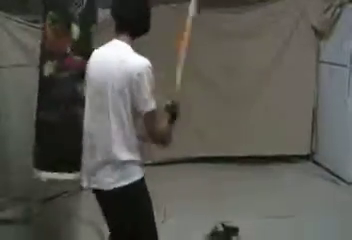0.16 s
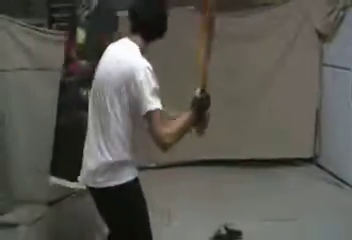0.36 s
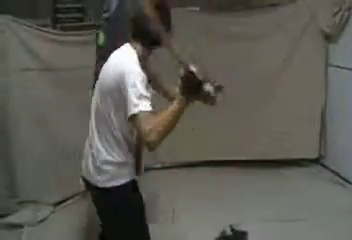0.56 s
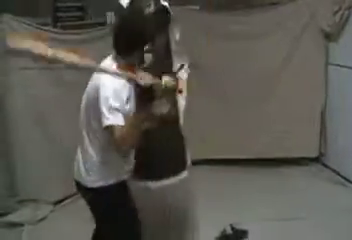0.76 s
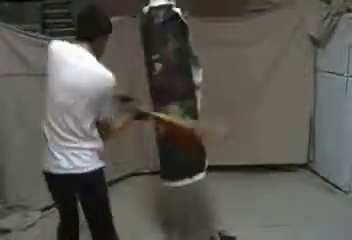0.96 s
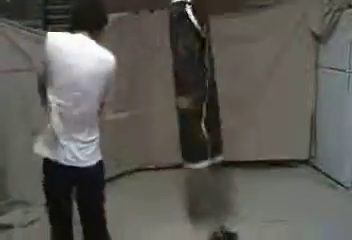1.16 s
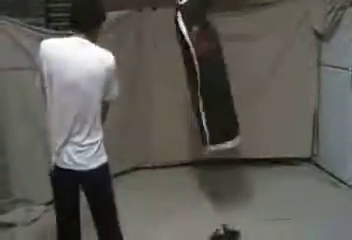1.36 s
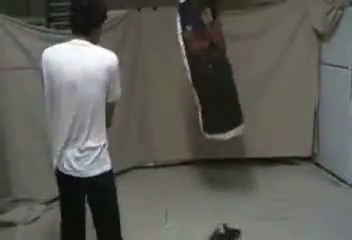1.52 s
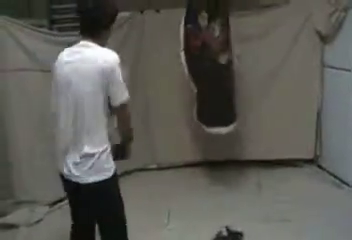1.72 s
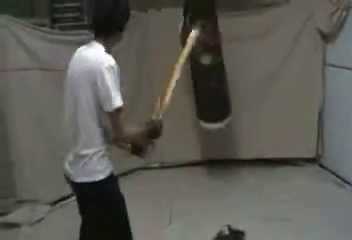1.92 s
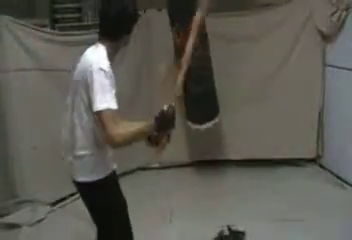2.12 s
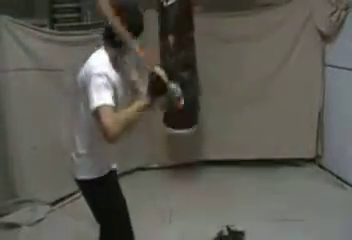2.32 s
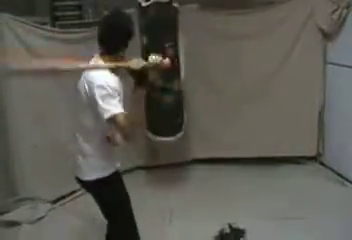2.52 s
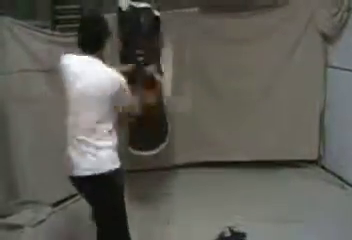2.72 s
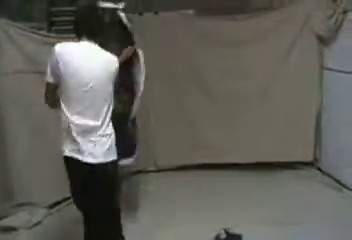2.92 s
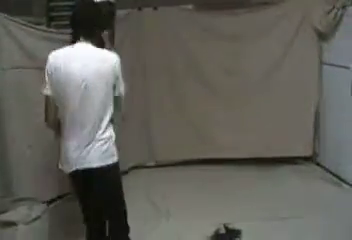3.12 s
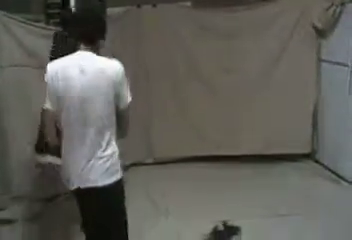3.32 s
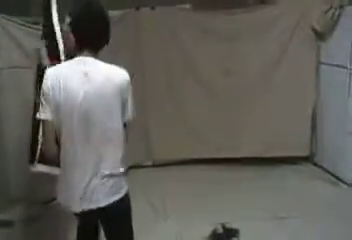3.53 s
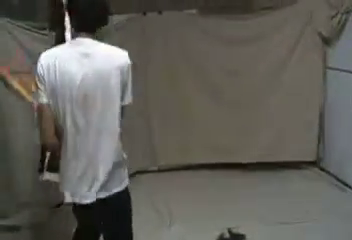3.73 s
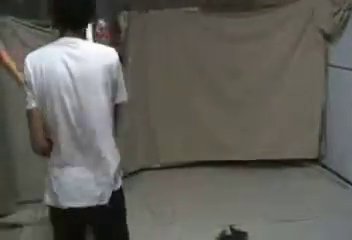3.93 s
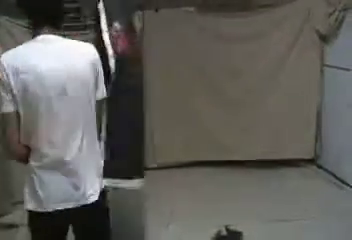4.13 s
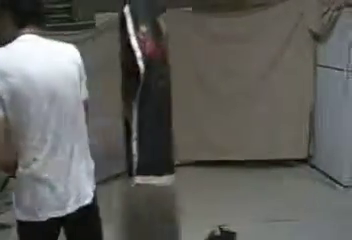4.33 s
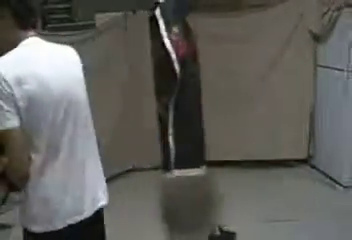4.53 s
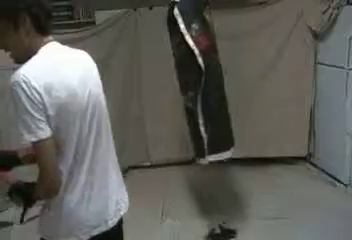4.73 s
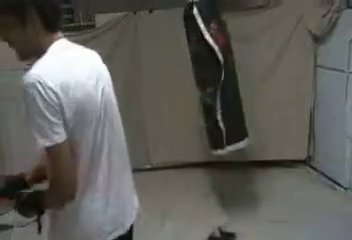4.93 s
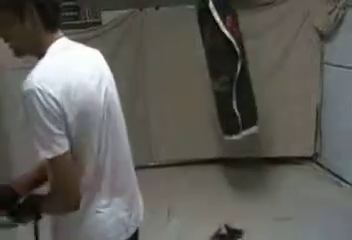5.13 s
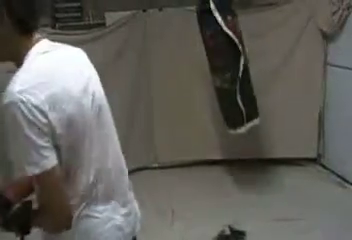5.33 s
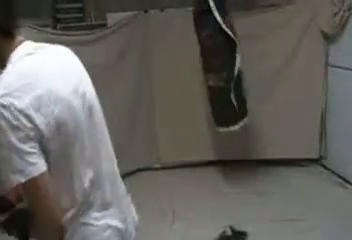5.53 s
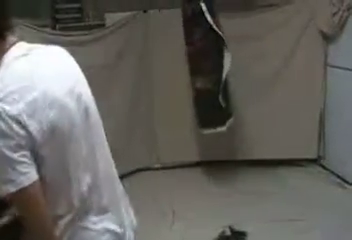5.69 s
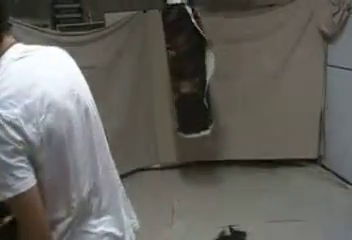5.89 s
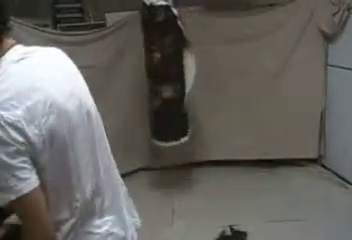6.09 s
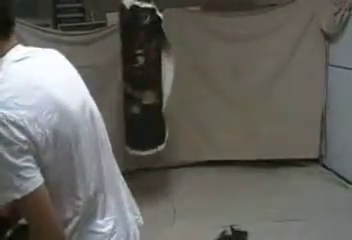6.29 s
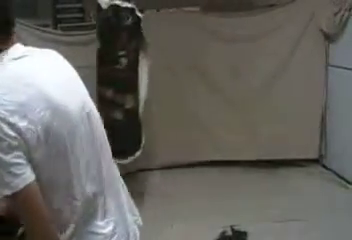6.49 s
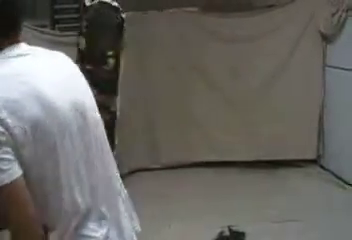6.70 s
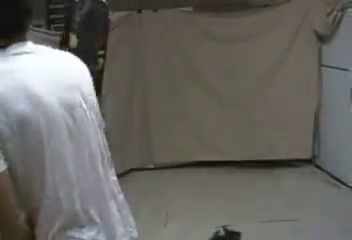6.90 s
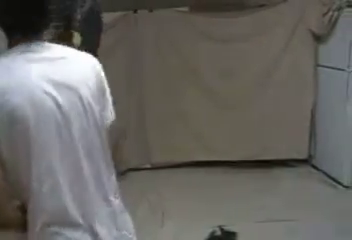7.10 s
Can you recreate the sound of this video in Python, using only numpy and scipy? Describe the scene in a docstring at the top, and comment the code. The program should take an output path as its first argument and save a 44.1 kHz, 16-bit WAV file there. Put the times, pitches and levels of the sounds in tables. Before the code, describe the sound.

In a humming garage, a wooden bat cracks twice into a heavy bag, walls rattling, before being set down hard on hollow wood.

```python
"""In a garage a wooden bat slaps a hanging heavy bag twice, then is put down hard on a hollow wooden surface.
The blows are noise slaps over a sine thump; the put-down bat excites drifting wood pitches. Resonant noise makes
the walls boom and wash. Shoes scuff in shaped noise and small things knock as short tones and filtered noise;
a soft rough tone comes and goes, and motor lines hum under rumble and hiss. Loud peaks overload a small microphone."""
import sys
import numpy as np
from scipy import signal
from scipy.fft import rfft, irfft, next_fast_len
from scipy.io import wavfile
from scipy.ndimage import uniform_filter1d

SR = 44100
rng = np.random.default_rng(int(sys.argv[2]) if len(sys.argv) > 2 else 0)


def dump(signal):
    """Clip the signal to [-1, 1] and save it as 16-bit WAV at the path in sys.argv[1]."""
    limited = np.clip(np.atleast_2d(signal).T, -1, 1)
    pcm = np.round(limited * 32767).astype(np.int16)
    wavfile.write(sys.argv[1], SR, pcm)


N = 315312
T = np.arange(N) / SR
AGE = np.arange(SR // 2) / SR  # time axis of a short sound, in seconds

# Bat on bag. Each row: start in seconds, crack level in dB, thump level in dB, thump pitch in Hz,
# contact time in seconds.
BAG_BLOWS = [(1.1753, 9.5, 0.5, 121, 0.0053), (2.9937, 7, 7.5, 110, .007)]
# Colour of the slap. Each row: frequency in Hz, relative density in dB per Hz.
CRACK_COLOUR = [(180, 1), (300, -2.5), (762, -10), (2250, -5), (3590, -10.5), (4630, -21), (8980, -20.5),
                (10900, -15.5), (14200, -57), (22000, -120)]
CRACK_T60_S, THUMP_T60_S = 0.015, 0.059

# Bat put down: first touch, then the full weight, then the moment the wood pitches line up.
TOUCH_S, WEIGHT_S, DEEPEST_S = 5.4215, 5.4248, 5.428
TOUCH_DB, WEIGHT_DB = -8, 4
# Pitches of the hollow wood. Each row: frequency in Hz, relative level in dB.
WOOD_PITCHES = [(151, 0), (215, -8.5), (285, -2.5), (345, -12.5), (436, -17), (590, -23.5)]

# Door and wall panels. Each row: resonance in Hz, width in Hz, relative level in dB.
PANEL_RESONANCES = [(28, 14, -5.5), (58.5, 19, 4)]
# Colour of the air's thud. Each row: frequency in Hz, relative density in dB per Hz.
THUD_COLOUR = [(76, -33), (130, -5.5), (167, 1), (427, -14), (450, -15), (580, -36), (990, -120)]
# Colour of the echoes and rattling. Each row: frequency in Hz, relative density in dB per Hz.
WASH_COLOUR = [(590, -28), (1000, -8), (1590, -1.5), (2020, -3.5), (2320, -1.5), (2670, -4.5), (3550, -5),
               (3860, -7.5), (4350, -7.5), (6000, -17), (7800, -55.5), (13200, -120)]
# Level of that wash, one curve for each blow and one for the drop. Each row: time in seconds, level in dB.
WASH_CURVES = [
    [(1.188, -19), (1.204, -20), (1.234, -16.5), (1.366, -21.5), (1.414, -26.5), (1.458, -25.5),
     (1.6, -35.5), (1.87, -56)],
    [(3.007, -22), (3.02, -22), (3.109, -16.5), (3.153, -25), (3.337, -29), (3.53, -42)],
    [(5.437, -28), (5.445, -29), (5.501, -30), (5.67, -45)],
]
# What else the garage gives back, same order. Each row: treble in dB over the wash, low part in dB over the wash,
# boom in dB, boom hold in seconds, standing wave in dB, thud in dB, thud hold in seconds, thud fall in dB per second.
GARAGE_ANSWERS = [(-15.5, -11, -21, .32, -16, -17.5, .09, 110),
                  (-12.5, -5, -19.5, .36, -15, -16.5, .11, 300), (-22, -4, -29, .03, -23, -12.5, .085, 230)]
TREBLE_FALL_DB_S, BODY_FALL_DB_S, BOOM_FALL_DB_S, STANDING_FALL_DB_S = 12, 16, 50, 60
LINGER_DB, LINGER_FALL_DB_S = -12, 50  # a weaker part of the thud stays on
# Slow cycles of pressure as the panels flap back. Each row: centre in seconds, peak in dB.
PANEL_SURGES = [(1.31, -13), (1.383, -5), (1.505, -8), (1.575, -18), (1.783, -18), (3.205, -6), (3.287, -5),
                (3.335, -11)]
SURGE_HZ, SURGE_S = 66, .013

# Thin bright ticks. Each row: start in seconds, level in dB, centre in Hz.
BRIGHT_TICKS = [(0.1294, -32, 3320), (0.2029, -13.5, 2560), (0.219, -27, 3000), (0.284, -33, 8500),
                (1.052, -34, 4000), (1.1265, -27, 1500), (1.238, -7, 1500), (4.2794, -41, 3260),
                (4.7686, -32, 2880), (4.8464, -30, 4100), (4.8783, -32, 2830), (5.2994, -38, 2700),
                (5.3911, -36, 3250)]
# Small knocks of feet, bat and gear. Each row: start in seconds, level in dB, centre in Hz, tail t60 in seconds,
# tail in dB over the level, bright click in dB over the level.
SMALL_KNOCKS = [(0.073, -19, 403, 0.47, -3, -14), (0.205, -14, 626, 0.38, -8.5, 1),
                (0.875, -28, 380, 0.25, -5, -3.5), (1.126, -29, 501, 0.25, -1, 6),
                (4.056, -13.5, 434, 0.43, -5, 0), (4.732, -21, 610, 0.17, -6, -18.5),
                (4.764, -25.5, 464, 0.2, -1, -9.5), (4.877, -24, 374, 0.23, -2.5, -8.5),
                (5.256, -14.5, 537, 0.6, -6, -12.5), (5.929, -22.5, 568, 0.25, -8, -6.5),
                (6.075, -18, 910, 0.25, -9, .6), (6.142, -18.5, 820, 0.25, -13, -19.5),
                (6.464, -31, 1080, 0.19, -3, -3.5)]
KNOCK_DELAY_S = .0015  # each knock sounds this many seconds after its listed start

# Shoes, cloth and the swung bat rubbing and swishing. Each row: loudest moment in seconds, level in dB,
# seconds to rise 20 dB, seconds to fall 20 dB, treble in dB over the level.
RUBS = [(0.01, -40, .05, .3, -12), (0.124, -38, .15, .2, -6), (0.206, -33, .02, .05, -12),
        (0.3, -48, .3, .5, -5), (1.1, -50, .08, .12, 5), (1.168, -39, .15, .02, -3),
        (1.962, -39, .08, .15, -4.5), (2.9, -50, .12, .1, 6), (2.98, -43, .05, .02, -20),
        (3.56, -38.5, .2, .1, -17), (3.61, -28.5, .06, .06, -5), (3.66, -40, .05, .2, -10),
        (4.1, -48.5, .03, .15, -9), (4.258, -47.5, .1, .25, -8), (4.49, -55, .12, .04, -5),
        (4.76, -57, .03, .2, 5), (5.304, -53, .12, .2, 4), (5.775, -36.5, .2, .2, -5),
        (5.86, -43, .1, .16, -12), (6.378, -44, .07, .1, -12)]
THIN_DB = -9  # rubs brighter than this lose their low end, duller ones gain it

# A soft rough tone, perhaps the hanging of the bag. Each row: start in seconds, length in seconds, pitch in Hz,
# level in dB.
CREAK_TONES = [(1.59, .13, 385, -48), (1.75, .2, 385, -54), (2.1, .45, 390, -58), (3.47, .055, 385, -38),
               (3.55, .1, 380, -47), (4.99, .25, 393, -43.5), (6.88, .16, 385, -47.5), (7.07, .1, 390, -49)]
CREAK_EDGE_S, CREAK_WANDER_HZ = .04, 12

# Motor lines. Each row: frequency in Hz, level in dB.
MOTOR_LINES = [(56.5, -42.5), (113.0, -35.5), (226.1, -58), (603, -65.5), (969.0, -71.5), (1254, -64.5),
               (1599, -65)]
# Low air movement. Each row: time in seconds, level in dB.
RUMBLE_LEVEL = [(0.0, -19), (0.086, -20), (0.508, -34), (1.088, -27), (1.8, -30), (2.016, -31),
                (2.752, -33), (2.858, -39), (2.96, -27), (3.7, -26), (4.054, -32), (5.38, -32),
                (5.848, -39), (6.05, -32.5), (6.87, -37), (7.15, -31.5)]
# Colour of the hiss. Each row: frequency in Hz, relative density in dB per Hz.
HISS_COLOUR = [(76, -31.5), (130, -4.5), (140, -18), (227, -18.5), (253, -21), (388, -22.5), (542, -27),
               (617, -26.5), (729, -31.5), (1560, -31.5), (10900, -45), (14200, -81.5), (22000, -120)]
# Swelling and sinking of the middle of the hiss. Each row: time in seconds, gain in dB.
HISS_SWELL = [(0.0, 0), (0.53, -2), (0.62, 2), (0.8, 3), (1.0, -.5), (2.1, 0), (2.27, 2), (2.7, -3),
              (3.9, -.5), (4.62, -4.5), (5.08, 3), (6.0, 0), (6.7, -6), (6.85, -4.5), (6.95, -1),
              (7.15, -1.5)]
HISS_DB, HISS_MIDDLE_HZ, HISS_WIDTH_HZ = -42.5, 1700, 2200

# How alike left and right are in all stereo noise. Each row: frequency in Hz, correlation from 0 to 1.
STEREO_LIKENESS = [(30, .99), (60, .997), (250, .992), (500, .96), (1000, .87), (2000, .72), (4000, .2),
                   (8000, .55)]
LEFT_DB = .8  # left over right
TOP_HZ = 11000


def blows():
    """A slap of the cover while the bat sinks in, and one heavy swing of pressure from the squeezed filling."""
    out, slap = np.zeros((2, N)), noise(CRACK_COLOUR)
    for s, crack_db, thump_db, hz, contact in BAG_BLOWS:
        slap_in = fall(0.15) * (AGE < contact) * cut(slap, s)
        slap_after = fall(CRACK_T60_S) * cut(slap, s + contact)
        thump = fall(THUMP_T60_S) * np.sin(2 * np.pi * hz * AGE)
        add(out, s, undb(crack_db) * slap_in)
        add(out, s + contact, undb(crack_db - 16.5) * slap_after)
        add(out, s, -undb(thump_db) * thump)
    return out


def drop(woody):
    """A tick of first contact, then a short hard push into the hollow wood."""
    out, grit = np.zeros((2, N)), band(930, 11000, skirt_db=-20)
    touch = fall(0.011, rise=.0004) * cut(grit, TOUCH_S)
    bright = fall(0.046) * ring(cut(grit, WEIGHT_S), 2000, 1900)
    push = fall(0.075, rise=.0004) * cut(woody, WEIGHT_S)
    clack = undb(-4) * fall(0.05, rise=.0006) * np.sin(2 * np.pi * 560 * AGE)
    add(out, TOUCH_S, undb(TOUCH_DB) * touch)
    add(out, WEIGHT_S, undb(-10) * bright)
    add(out, WEIGHT_S, undb(WEIGHT_DB) * (push - clack))
    return out


def wood():
    """The pitches of the hollow wood, in step at the blow and drifting apart after it; rms 1."""
    drift = np.clip((T - DEEPEST_S) / .03, 0, 1)
    pitches = 0
    for hz, db in WOOD_PITCHES:
        level = undb(db + 3.7 * drift * walk(60))
        phase = 2 * np.pi * hz * (T - DEEPEST_S) + 2.1 * drift * walk(60)
        pitches = pitches + level * np.cos(phase)
    return unit(pitches)


def surges():
    """A few cycles of slow pressure swell and fade each time the panels flap back."""
    out = 0
    for s, db in PANEL_SURGES:
        swell = np.exp(-.5 * ((T - s) / SURGE_S) ** 2)
        out = out + undb(db) * swell * np.cos(2 * np.pi * SURGE_HZ * (T - s))
    return out


def garage(woody):
    """Panels boom long, the air thuds, and a grainy wash of echoes and rattling loses its treble."""
    push = band(20, 80)
    boom = unit(sum(undb(db) * ring(push, hz, width) for hz, width, db in PANEL_RESONANCES))
    standing = band(75, 112.3, skirt_db=-28)  # lowest standing waves of the room
    grain = undb(1.4 * walk(150))
    wash, treble, body = noise(WASH_COLOUR), band(6800, 9470), band(440, 880, skirt_db=-14)
    # after the drop the walls return the pitches of the wood
    thud = np.where(T < TOUCH_S, noise(THUD_COLOUR), woody)
    out = surges()
    for curve, row in zip(WASH_CURVES, GARAGE_ANSWERS):
        treble_db, body_db, boom_db, boom_hold, standing_db, thud_db, thud_hold, thud_fall = row
        s, db = np.transpose(curve)
        age = T - s[0]
        onset = np.clip(1 + age / .004, 0, 1)
        fade_out = np.clip(1 - (T - s[-1]) / .04, 0, 1)
        wash_level = undb(np.interp(T, s, db)) * fade_out

        lows = held(age, boom_db, boom_hold, BOOM_FALL_DB_S) * boom
        lows = lows + held(age, standing_db, 0, STANDING_FALL_DB_S) * standing
        thud_level = held(age, thud_db, thud_hold, thud_fall)
        linger_level = held(age, thud_db + LINGER_DB, 0, LINGER_FALL_DB_S)
        highs = wash + held(age, treble_db, 0, TREBLE_FALL_DB_S) * treble
        highs = highs + held(age, body_db, 0, BODY_FALL_DB_S) * body
        out = out + onset * (lows + (thud_level + linger_level) * thud + grain * wash_level * highs)
    return out


def ticks(grain):
    """Thin bright ticks: short noise through two equal resonances."""
    out = np.zeros((2, N))
    for s, db, hz in BRIGHT_TICKS:
        burst = fall(.04) * cut(grain, s)
        add(out, s, undb(db) * ring(ring(burst, hz, .6 * hz), hz, .6 * hz))
    return out


def knocks():
    """Ticks, and dead knocks of a few cycles, each with a brighter click and a short roomy tail."""
    grain = band(250, 9000, skirt_db=-12)
    out = ticks(grain)
    for s, db, hz, t60, tail_db, click_db in SMALL_KNOCKS:
        phase = 2 * np.pi * hz * AGE
        modes = np.sin(phase) + .6 * np.sin(.63 * phase) + .5 * np.sin(1.47 * phase)
        body = fall(.012, rise=.0015) * modes
        tail = ring(ring(fall(t60, rise=.004) * cut(grain, s), hz, 1.2 * hz), hz, 1.6 * hz)
        click_tones = np.sin(2 * np.pi * 2300 * AGE) + .7 * np.sin(2 * np.pi * 1350 * AGE)
        # the bright tail reads the grain 0.1 s further on
        bright_tail = ring(ring(fall(1.03 * t60) * cut(grain, s + .1), 2000, 2100), 2000, 2400)
        click = fall(0.005, rise=0.0005) * click_tones + 0.12 * bright_tail
        knock = 2.12 * body + undb(tail_db) * tail + undb(click_db) * click
        add(out, s + KNOCK_DELAY_S, undb(db) * knock)
    return out


def scuffs():
    """Dense gritty friction; each rub swells to its loudest and dies away."""
    power, bright, dull = 0, 0, 0
    for s, db, rise, drop_s, treble_db in RUBS:
        away = np.where(T < s, (s - T) / rise, (T - s) / drop_s)
        rub = undb(db - 20 * away) ** 2 * (away < 1)
        power = power + rub
        bright = bright + rub * undb(treble_db) ** 2
        dull = dull + rub * undb(THIN_DB - treble_db) ** 2
    low = noise([(200, -37.5), (500, -0.5), (1500, -0.5), (4500, -4.5), (6500, -25.5), (9000, -91.5)])
    bottom = ring(low, 600, 700)
    treble = band(3700, 7900, skirt_db=-8.5)
    grit = np.sqrt(power) * (low - bottom) + np.sqrt(dull) * bottom + np.sqrt(bright) * treble
    return undb(1.3 * walk(200)) * grit


def creak():
    """A rough, throbbing tone with a faint smeared overtone."""
    starts, lengths, pitches, _ = np.transpose(CREAK_TONES)
    hz = np.interp(T, starts + lengths / 2, pitches) + CREAK_WANDER_HZ * walk(12)
    level = 0
    for s, length, _, db in CREAK_TONES:
        inside = np.minimum(T - s, s + length - T)
        level = level + undb(db) * np.clip(inside / CREAK_EDGE_S + .5, 0, 1)
    phase = 2 * np.pi * np.cumsum(hz) / SR + 2.5 * walk(50)
    tone = np.sin(phase) + undb(-13) * np.sin(3.3 * phase)
    return level * undb(4.2 * walk(120)) * np.sqrt(2) * tone


def motor():
    """Steady pitches of a motor whose level and phase waver."""
    hum = 0
    for hz, db in MOTOR_LINES:
        level = undb(db + 1.5 * walk(15)) * np.sqrt(2)
        hum = hum + level * np.sin(2 * np.pi * hz * T + .35 * walk(10))
    return hum


def low_air():
    """Rumble of low air movement: deep noise that rises and sinks."""
    colour = noise([(6, -29), (14, 5), (35, -10.5), (57, -8.5), (75, -9.5), (100, -32), (140, -22.5), (300, -75.5)])
    return undb(np.interp(T, *np.transpose(RUMBLE_LEVEL)) + 1.4 * walk(5.13)) * colour


def microphone_hiss():
    """Nearly steady microphone noise whose middle swells and sinks."""
    hiss = undb(HISS_DB + .7 * walk(4)) * noise(HISS_COLOUR)
    middle = ring(hiss, HISS_MIDDLE_HZ, HISS_WIDTH_HZ)
    swell = undb(np.interp(T, *np.transpose(HISS_SWELL)))
    return hiss - middle + swell * middle


def undb(db):
    """Amplitude from decibels."""
    return 10 ** (np.asarray(db) / 20)


def unit(x):
    """Scale to rms 1."""
    return x / np.sqrt(np.mean(x ** 2))


def along(points, hz):
    """Read (Hz, value) points on a log-frequency axis."""
    f, v = np.transpose(points)
    return np.interp(np.log(hz + 1), np.log(f), v)


def noise(points):
    """Stereo noise of a given colour, alike left and right in the bass; rms 1."""
    size = next_fast_len(N)
    hz = np.arange(size // 2 + 1) * SR / size
    alike = np.clip(along(STEREO_LIKENESS, hz), 0, 1)
    mid, side = rfft(rng.standard_normal((2, size))) * undb(along(points, hz))
    spectra = np.array([mid * np.sqrt(1 + alike), side * np.sqrt(1 - alike)])
    mid, side = irfft(spectra, size)[:, :N]
    return unit(np.array([mid + side, mid - side]))


def band(lo_hz, hi_hz, skirt_db=-30):
    """Flat band of noise, down to skirt_db half an octave outside and falling further beyond."""
    lower = [(lo_hz / 4, -90), (lo_hz / np.sqrt(2), skirt_db), (lo_hz, 0)]
    upper = [(hi_hz, 0), (hi_hz * np.sqrt(2), skirt_db), (hi_hz * 4, -90)]
    return noise(lower + upper)


def walk(rate):
    """Random levels held 1 / rate s and slewed twice."""
    k = int(SR / rate)
    steps = np.repeat(rng.standard_normal(N // k + 1), k)
    return uniform_filter1d(uniform_filter1d(steps, k), k)[:N]


def fall(t60, rise=0.000067):
    """Half a second of an envelope that jumps up and dies away."""
    return (1 - np.exp(-AGE / rise)) * np.exp(-np.log(1000) * AGE / t60)


def held(age, level_db, hold, fall_db_s):
    """Level that holds, then falls at a steady rate in dB per second."""
    return undb(level_db - fall_db_s * np.clip(age - hold, 0, None))


def ring(x, hz, width_hz):
    """Resonance with gain 1 at the centre."""
    return signal.lfilter(*signal.iirpeak(hz, hz / width_hz, fs=SR), x)


def add(out, s, x):
    """Mix a short sound in at time s."""
    i = int(s * SR)
    out[:, i:i + len(AGE)] += x


def cut(x, s):
    """Half a second of a long sound from time s."""
    i = int(s * SR)
    return x[..., i:i + len(AGE)]


def scene():
    """All sources, a little louder on the left."""
    woody = wood()
    mix = blows() + drop(woody) + garage(woody) + knocks() + scuffs() + creak()
    mix = mix + motor() + low_air() + microphone_hiss()
    return mix * undb([[LEFT_DB / 2], [-LEFT_DB / 2]])


def record(dry):
    """The microphone input clips flat when overloaded; a steep low-pass cuts the top."""
    overloaded = np.clip(dry, -.97, .97)
    top_cut = signal.ellip(10, .2, 67, TOP_HZ, fs=SR, output="sos")
    return signal.sosfilt(top_cut, overloaded)


dry = scene()
out = record(dry)
dump(out)
```